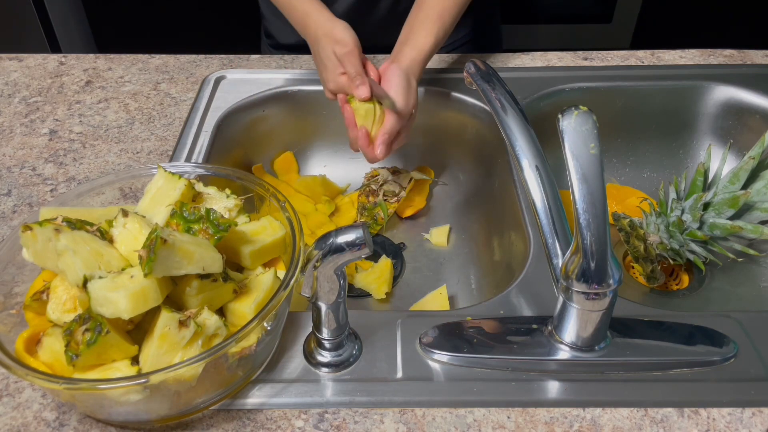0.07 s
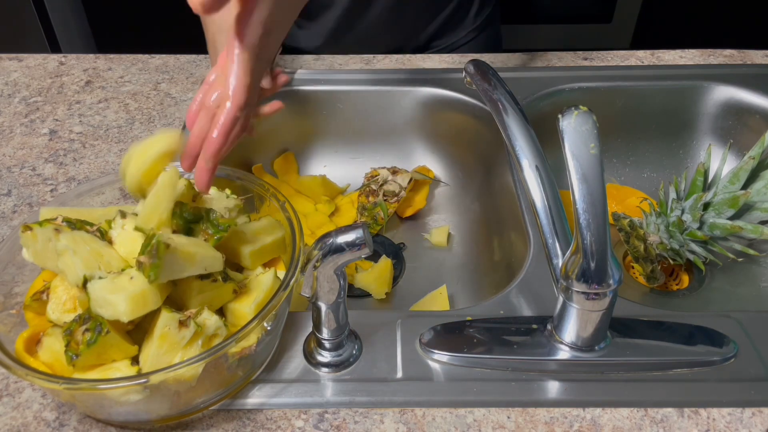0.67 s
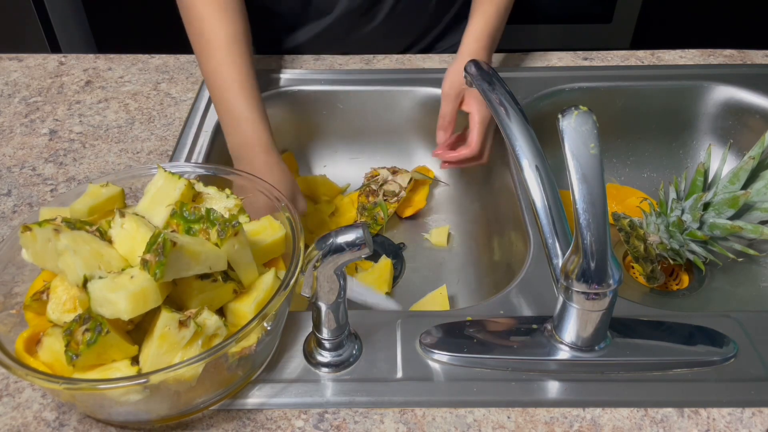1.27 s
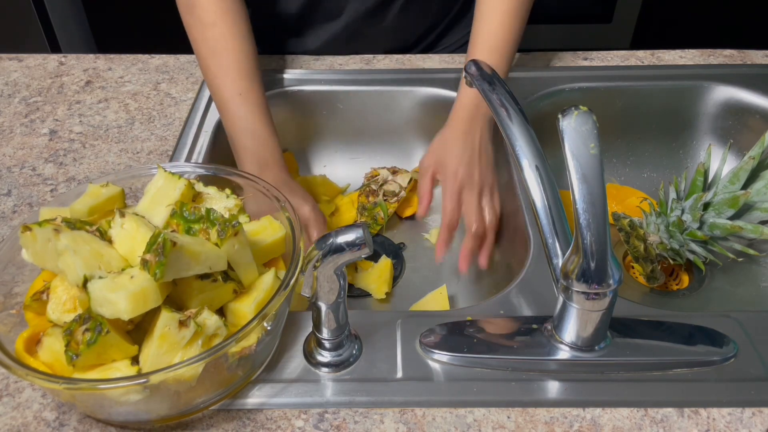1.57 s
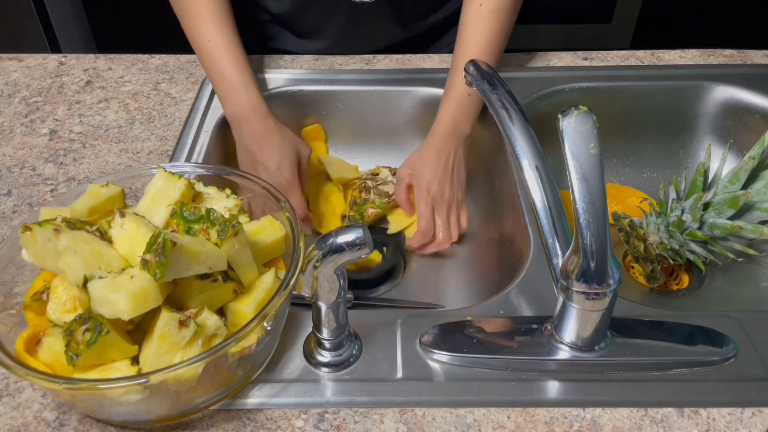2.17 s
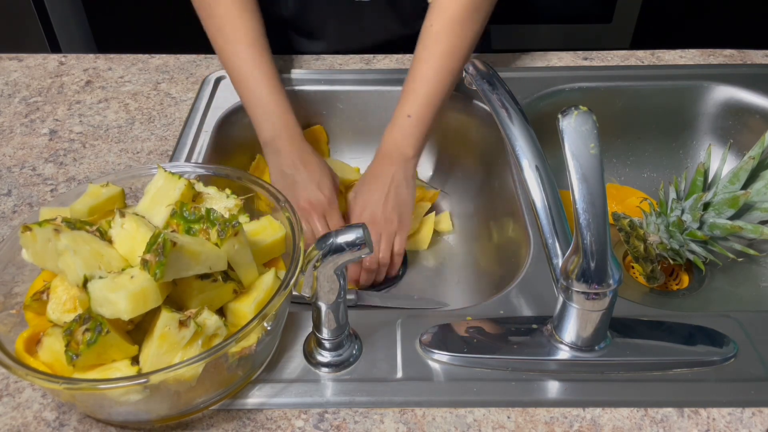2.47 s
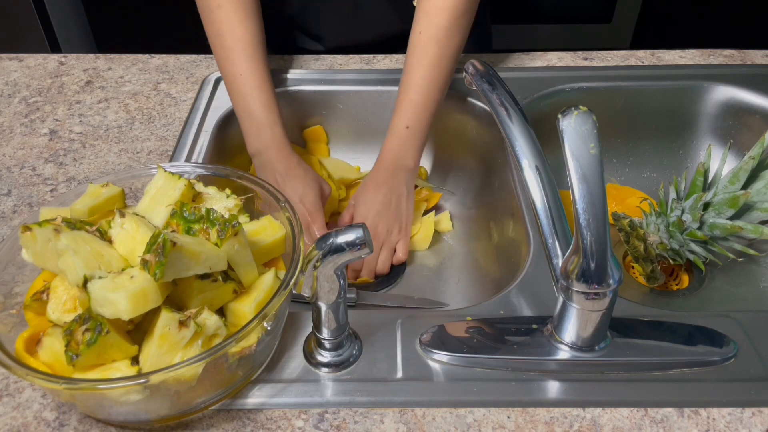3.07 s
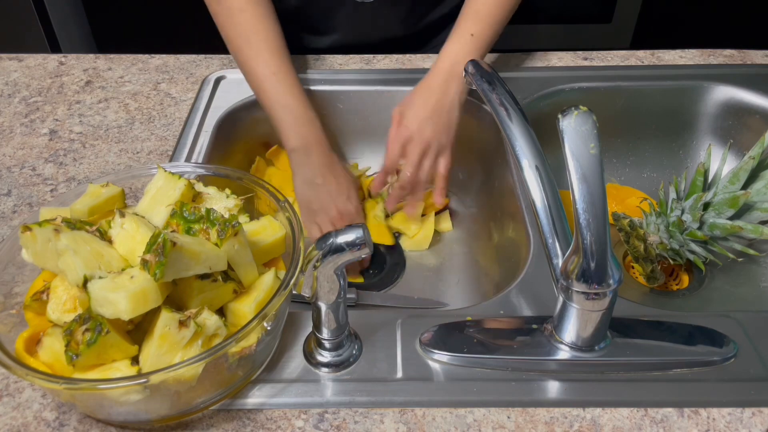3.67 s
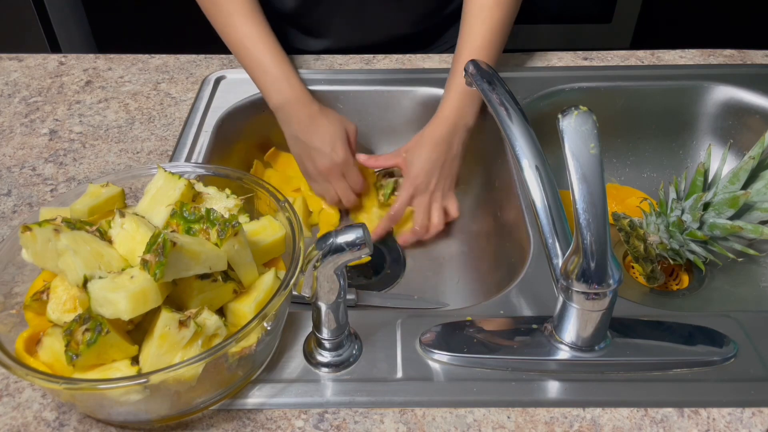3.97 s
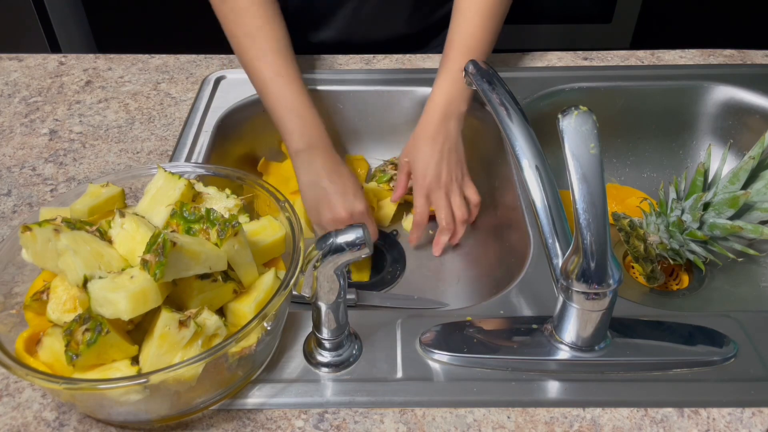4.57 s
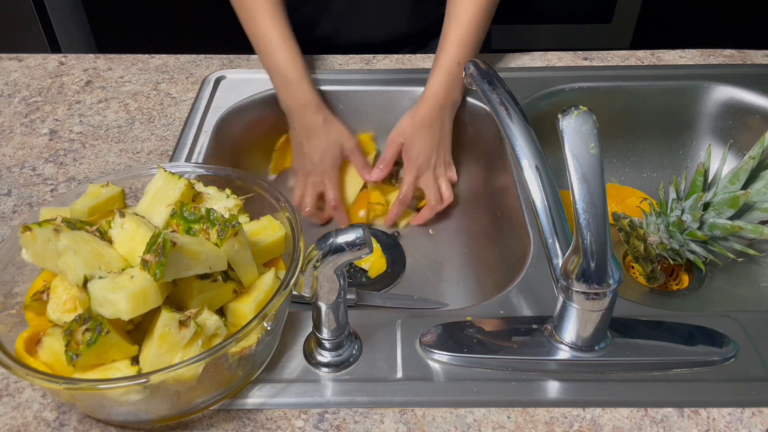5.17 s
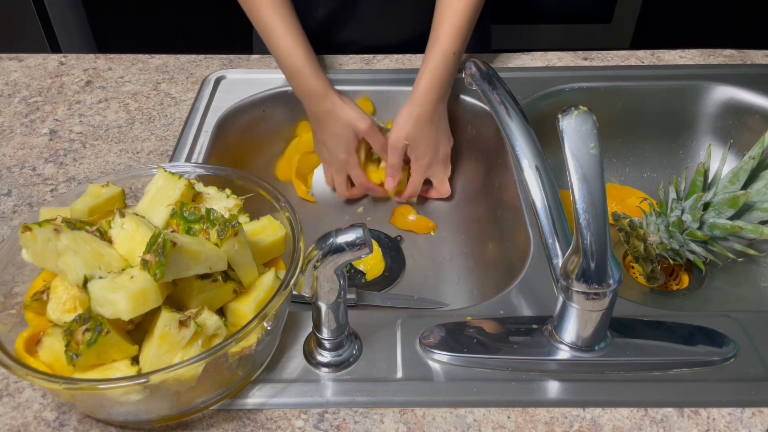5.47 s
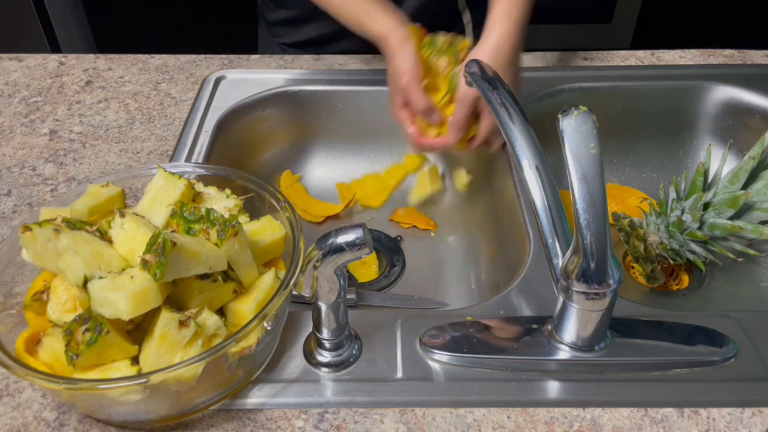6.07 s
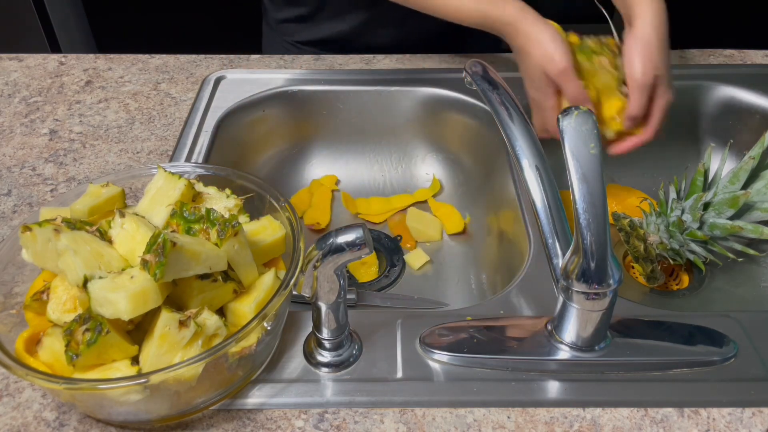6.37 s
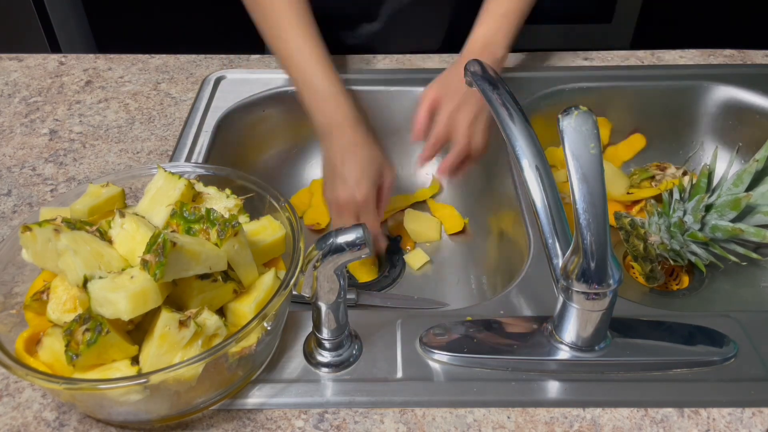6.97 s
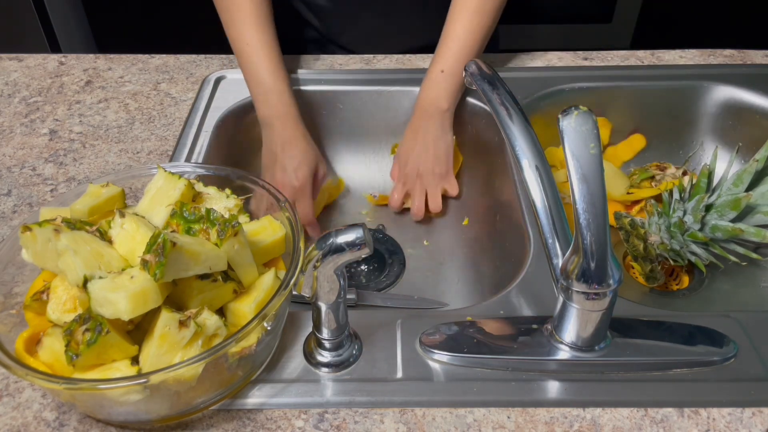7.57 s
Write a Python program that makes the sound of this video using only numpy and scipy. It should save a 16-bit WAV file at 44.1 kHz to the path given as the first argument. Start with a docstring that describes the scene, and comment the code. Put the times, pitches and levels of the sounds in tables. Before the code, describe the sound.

A knife clanks into a metal sink, then wet fruit scraps are scraped together and dumped with slaps, squelches and hollow thumps.

```python
"""Wet rustling, slaps and hollow booms: hands clear fruit peel out of a steel kitchen sink, near a phone.
A knife clatters into the basin, fingers sweep the scraps together and tap the drain strainer,
and a handful is dumped into the second basin. The thin steel floor booms under every push,
sliding peel rasps and juice crackles. A small kitchen and its low hum lie behind."""
import sys
import numpy as np
from scipy import signal
from scipy.fft import rfft, irfft, next_fast_len
from scipy.io import wavfile
from scipy.ndimage import uniform_filter1d

SR = 44100
rng = np.random.default_rng(int(sys.argv[2]) if len(sys.argv) > 2 else 0)


def to_wav(s):
    """Save 16-bit WAV."""
    ch = np.atleast_2d(s).T  # columns
    pcm = np.round(np.clip(ch, -1, 1) * 32767)  # PCM
    wavfile.write(sys.argv[1], SR, pcm.astype(np.int16))


N = 345303
TIME = np.arange(N) / SR
AGE = np.arange(int(.45 * SR)) / SR  # seconds since one short sound began

# ringing notes of the basin wall and the steel panel: f/Hz, level/dB, t60/s (time to fade by 60 dB)
WALL_NOTES = [(226.5, 10, 0.07), (250, 5.5, 0.075), (297.4, -7.5, 0.41), (352, -9, 0.2), (480, -7, 0.11)]
PANEL_NOTES = [(647, -5, 0.077), (934, 2.5, 0.11), (1178, 2, 0.12), (1313, 6.5, 0.11), (1534, -4.5, 0.22),
               (1530, -3.5, 0.18), (1637, 7, 0.15), (1890, -1.5, 0.067), (2160, -21, 0.2),
               (2420, -20, 0.27), (2530, -6.5, 0.21), (2810, -5, 0.1), (3440, -32, 0.056),
               (4070, 5.5, 0.04)]
# tone curves of rubbed steel, fizzing juice, crisp clicks and sticky fruit: f/Hz, level/dB
RUB_TONE = [(150, -33.5), (350, 5.5), (520, 2.5), (680, 3), (850, 1.5), (1050, 1), (1300, -0.5),
            (1550, -1.5), (2100, -6.5), (3200, -7.5), (5000, -18.5), (12000, -40)]
FIZZ_TONE = [(700, -40.5), (2000, 7.5), (3500, 2.5), (4700, 6), (5600, -1), (6800, 5.5), (8500, -4.5),
             (12000, -3.5), (14000, -11), (16000, -49.5)]
CRISP_TONE = [(4000, -4), (6500, 4), (9000, 0), (11000, 3.5), (13500, -1.5), (15500, -12)]
STICKY_TONE = [(900, -21), (1800, 3), (4200, -3), (6500, -9), (9000, -18.5), (13000, -14), (15500, -18)]


def undb(db):
    """Turn decibels into a gain."""
    return 10 ** (np.asarray(db) / 20)


def unit(x):
    """Scale to an average (rms) level of 1."""
    return x / np.sqrt(np.mean(x ** 2))


def at_level(x, db, size=660):
    """Scale a sound so that its start (15 ms by default) has this level."""
    return x * undb(db) / np.sqrt(np.mean(x[:size] ** 2))


def fade(t60):
    """Die away by 60 dB in t60 seconds."""
    return np.exp(-np.log(1000) * AGE / t60)


def onset(rise_s):
    """Rise from silence; a softer contact rises more slowly."""
    return 1 - np.exp(-AGE / rise_s)


def burst(t60):
    """Noise that dies away."""
    return rng.standard_normal(len(AGE)) * fade(t60)


def add(track, s, x):
    """Mix a sound in at s seconds."""
    i = int(s * SR)
    track[i:i + len(x)] += x[:N - i]


def dull(x, hz, order=2):
    """Turn down the treble above hz."""
    return signal.sosfilt(signal.butter(order, hz, fs=SR, output="sos"), x)


def colour(x, tone):
    """Filter a sound through a tone curve."""
    n = 2 * next_fast_len(x.shape[-1])
    hz, db = np.transpose(tone)
    bin_hz = np.arange(n // 2 + 1) * SR / n
    curve_db = np.interp(np.log(bin_hz + 1), np.log(hz), db)
    # folding the cepstrum makes the filter ring only after a hit, never before
    cepstrum = irfft(np.log(undb(curve_db)))
    cepstrum[1:n // 2] *= 2
    cepstrum[n // 2 + 1:] = 0
    return irfft(rfft(x, n) * np.exp(rfft(cepstrum)))[..., :x.shape[-1]]


def resonate(x, hz, q):
    """Pick out one pitch; a higher q rings longer."""
    return signal.lfilter(*signal.iirpeak(hz, q, fs=SR), x)


def crack(hz, t60, q):
    """A very short smack around one pitch."""
    return resonate(burst(t60)[:2048], hz, q)


def ring(notes, scatter_db=2, detune=0.0054):
    """Steel struck at a new spot: each note gets its own strength, sign and slight mistuning."""
    out = np.zeros(len(AGE))
    for hz, db, t60 in notes:
        strength, tuning, sign = rng.standard_normal(3)
        wave = np.sin(2 * np.pi * hz * (1 + detune * tuning) * AGE)
        out += np.sign(sign) * undb(db + scatter_db * strength) * fade(t60) * wave
    return out


def wander(per_s):
    """A smooth random drift with a spread near 1."""
    step = int(SR / per_s)
    stairs = np.repeat(rng.standard_normal(N // step + 1), step)
    return unit(uniform_filter1d(stairs, step)[:N])


def grains(size, per_s, spread_db):
    """Tiny random clicks of very unequal strength."""
    strength = undb(spread_db * np.minimum(rng.exponential(size=size), 4))
    return unit(rng.standard_normal(size) * strength * (rng.random(size) < per_s / SR))


def effort(start, length, grip_s, ease_db_per_s=16, let_go_s=0.029):
    """Strength of one hand movement: it takes hold, eases off as the hand slows, and lets go."""
    age = np.maximum(TIME - start, 0)
    hold = undb(-ease_db_per_s * np.minimum(age, length))
    release = np.exp(-np.maximum(age - length, 0) / let_go_s)
    return np.minimum(age / grip_s, 1) * hold * release


def diffuse(size, alike_hz=350, alike=.95):
    """Noise from all sides: left and right are alike in the bass, unrelated in the treble."""
    mid, side = rfft(rng.standard_normal((2, size)))
    hz = np.arange(len(mid)) * SR / size
    likeness = alike / (1 + (hz / alike_hz) ** 2)
    common = mid * np.sqrt(1 + likeness)
    opposite = np.array([[1], [-1]]) * side * np.sqrt(1 - likeness)
    return irfft(common + opposite, size) / np.sqrt(2)


def kitchen(air_db=-51, waver_db=1, hum_hz=60, hum_db=-56):
    """Gently wavering room noise and the hum of an appliance."""
    # tone of the room noise: f/Hz, level/dB
    air_tone = [(25, -33.5), (45, -4.5), (62, -1), (95, 2.5), (140, -13), (195, -7), (290, -17), (560, -17),
                (750, -26.5), (1000, -23.5), (1600, -28), (5500, -35), (9000, -41.5), (13500, -47),
                (16000, -63)]
    air = unit(colour(diffuse(N, alike_hz=566, alike=0.89), air_tone))
    hum = np.sqrt(2) * np.sin(2 * np.pi * hum_hz * TIME)
    return air * undb(air_db + waver_db * wander(4.13)) + hum * undb(hum_db)


def echoes(x, bass_t60=0.47, treble_t60=0.096, early_t60=0.035, early_db=5, first_s=0.0022, gain_db=-6):
    """Sound bounces quickly between the basin walls, then dies away in the small kitchen."""
    noise = diffuse(len(AGE))
    bass = dull(noise, 1500, order=1)
    tail = bass * fade(bass_t60) + (noise - bass) * fade(treble_t60)
    early = undb(early_db) * diffuse(len(AGE)) * fade(early_t60)
    echo = unit((tail + early) * (AGE > first_s)) / np.sqrt(len(AGE))
    echo = colour(echo, [(160, -8.5), (260, -1.0), (420, -5.0), (8000, 5.0), (15000, -8.0)])
    return undb(gain_db) * signal.fftconvolve(x[None], echo, axes=1)[:, :N]


def bubbles(count=540, db=-64.5, scatter_db=4.5, low_hz=800, high_hz=5500, cycles=16, rise=.12):
    """Tiny bubbles burst in the film of juice, each a brief rising blip."""
    out, age = np.zeros(N), AGE[:3000]
    for when, pitch, strength in rng.random((count, 3)):
        hz = low_hz * (high_hz / low_hz) ** pitch
        life = np.minimum(age * hz / cycles, 2)
        blip = np.sin(2 * np.pi * hz * age * (1 + rise * life)) * life * np.exp(-np.log(1000) * life)
        tilt_db = -2 * np.log2(hz / low_hz)  # higher blips are quieter
        add(out, when * N / SR, at_level(blip, db + scatter_db * (2 * strength - 1) + tilt_db))
    return out


def sticky_fingers(per_s=26, spread_db=1.5, q=6, grip_s=0.049):
    """Threads of juice part between fingers and fruit: sparse tiny clicks at ten pitches."""
    # fingers squeezing the fruit: start/s, length/s, level/dB
    squeezes = [(0, 0.21, -68), (0.54, 0.42, -68), (1.09, 0.41, -69), (1.87, 0.32, -57), (2.5, 0.22, -69),
                (3.234, 0.17, -73.5), (3.71, .5, -65.5), (4.266, 0.25, -68), (4.68, 0.19, -71),
                (4.98, 0.46, -66)]
    squeezing = sum(undb(db) * effort(start, length, grip_s) for start, length, db in squeezes)
    clicks = sum(unit(resonate(grains(N, per_s, spread_db), hz, q)) * np.sqrt(hz)
                 for hz in np.geomspace(1400, 12000, 10))
    return unit(colour(clicks, STICKY_TONE)) * squeezing


def ticks(t60=0.0081):
    """Tiny bright clicks: the knife ticking on steel, and wet peel coming loose."""
    # clicks of the knife and the peel: t/s, level/dB
    clicks = [(.648, -62), (.657, -68), (.716, -73), (.778, -74), (.814, -69), (.836, -68), (0.869, -63),
              (.94, -69), (1.442, -40.5), (1.483, -39), (2.452, -72), (2.77, -67), (3.283, -75),
              (4.712, -72), (2.929, -61), (3.1092, -59), (3.81, -60.5), (4.134, -61), (4.216, -65),
              (4.372, -55.5), (4.403, -64), (6.031, -67), (6.102, -59.5), (6.154, -47.5), (6.284, -67),
              (6.576, -45)]
    out = np.zeros(N)
    for s, db in clicks:
        add(out, s, at_level(colour(burst(t60)[:4096], CRISP_TONE), db))
    return out


def rustle(flutter_db=5.5, grip_s=0.049):
    """Thin peel slides over peel with a fine, bright crackle."""
    # sliding movements: start/s, length/s, level/dB
    slides = [(0, 0.075, -66.5), (.62, .28, -81), (1.677, 0.18, -40.5), (1.86, 0.59, -63.5),
              (2.5, 0.33, -72.5), (3.326, 0.17, -73), (3.92, 0.19, -67), (4.965, 0.26, -55),
              (5.27, 0.12, -74), (5.455, 0.16, -61), (6.37, 0.14, -59), (6.5, 0.15, -52.5),
              (6.681, 0.015, -38), (6.75, 0.041, -52), (7.184, 0.061, -71), (7.613, 0.37, -58.5)]
    sliding = sum(undb(db) * effort(start, length, min(grip_s, length)) for start, length, db in slides)
    crisp = unit(colour(grains(N, 2200, 2.3), CRISP_TONE))
    return crisp * sliding * undb(flutter_db * wander(63))


def judders(width_hz=22):
    """A finger slips in quick, uneven jerks, making the panel give a short groan that glides in pitch."""
    # fingers and peel juddering on steel: start/s, length/s, f/Hz, glide/octaves, level/dB
    groans = [(1.565, 0.054, 479.4, 0.0028, -38.5), (1.613, 0.061, 498, -0.07, -40.5),
              (1.711, 0.035, 375.2, -0.015, -35.5), (1.899, 0.093, 655, 0.049, -45.5),
              (1.938, 0.034, 1734, .06, -43.5), (2.03, 0.05, 482, 0.087, -45.5),
              (2.065, 0.07, 558.6, -0.081, -41.5), (2.08, 0.054, 1110, -0.12, -47),
              (2.13, 0.14, 498, 0.17, -49), (2.198, 0.073, 738, -0.13, -48), (3.191, 0.036, 702, 0.43, -59),
              (5.436, 0.039, 648, 0.053, -52), (6.074, 0.081, 287, -0.053, -47),
              (6.268, 0.084, 306, 0, -43), (6.36, 0.11, 319, -0.045, -56)]
    out = np.zeros(N)
    for s, length, hz, glide, db in groans:
        travel = np.minimum(AGE / length, 1)
        tone = np.exp(2j * np.pi * np.cumsum(hz * 2 ** (glide * travel)) / SR)
        # keep the slips near the pitch; reversing skips the filter's slow start
        wobble = dull(grains(len(AGE), 2300, 0.55) / tone, width_hz)[::-1]
        groan = np.real(wobble * tone) * np.sin(np.pi * travel)
        add(out, s, at_level(groan, db, size=int(length * SR)))
    return out


def flicks(wet, count=480, relative_db=-7, scatter_db=7, low_hz=1800, high_hz=12000):
    """Wet edges of dragged peel flick free at random, each with its own pitch and strength."""
    out = np.zeros(N)
    for when, pitch, strength in rng.random((count, 3)):
        flick = crack(low_hz * (high_hz / low_hz) ** pitch, t60=0.005, q=2.5)
        add(out, when * N / SR, at_level(flick, relative_db + scatter_db * (2 * strength - 1)))
    return colour(out, STICKY_TONE) * wet


def sweep(jerk_db=5.5, panel_db=2, panel_q=30, catch_db=-1, stick_db=-47):
    """Dragged peel makes the floor rumble, the panels rasp and the water fizz; pressed hard, it jerks."""
    # hand strokes: start/s, length/s, grip time/s, rumble/dB, rubbing/dB, fizz/dB
    strokes = [(0, 0.042, 0.016, -51, -61, -63), (0.62, 0.28, 0.04, -76, -67, -74),
               (1.472, 0.19, .03, -34.5, -46, -38.5), (1.706, 0.12, 0.044, -40, -43.5, -44.5),
               (1.88, 0.12, 0.027, -54, -44, -49), (2.037, 0.21, 0.042, -51.5, -44, -57),
               (2.186, 0.037, 0.031, -38, -43.5, -55.5), (2.527, .28, 0.043, -46.5, -75.5, -73),
               (2.885, 0.11, 0.047, -49, -79.5, -70), (3.353, 0.134, 0.14, -61, -69, -63),
               (3.873, .17, 0.047, -50, -54, -56), (4.353, 0.21, 0.026, -50.5, -62.5, -79),
               (4.901, 0.15, 0.025, -45.5, -53.5, -57), (4.986, .24, 0.027, -48.5, -51, -54.5),
               (5.208, 0.24, .06, -55.5, -58.5, -73), (5.38, 0.29, 0.097, -48, -58, -56.5),
               (6.251, 0.048, 0.042, -36, -40.5, -52), (6.336, 0.74, .06, -65, -64.5, -63.5),
               (6.596, 0.011, 0.0053, -46, -44, -51.5), (6.664, 0.056, .03, -66, -62.5, -73),
               (6.778, 0.049, .02, -42, -80, -61), (7.101, 0.1, 0.012, -38.5, -53.5, -59.5),
               (7.163, 0.077, 0.073, -61, -43.5, -44.5), (7.268, 0.25, 0.098, -48.5, -50.5, -55.5),
               (7.538, .32, 0.065, -56, -54, -55)]
    # the hands never quite rest: rumble/dB, rubbing/dB, fizz/dB
    fidget_db = (-61, -71.5, -96)
    # tone of the rumbling basin floor: f/Hz, level/dB
    rumble_tone = [(50, -19), (105, -28), (138, 6.5), (190, -13), (270, -10), (350, -22), (500, -34),
                   (1000, -75)]
    moving = sum(undb(levels)[:, None] * effort(start, length, grip)
                 for start, length, grip, *levels in strokes)
    push, rub, wet = np.hypot(moving, undb(fidget_db)[:, None])
    sticking = rub / (rub + undb(stick_db))
    jerks = undb(jerk_db * sticking * wander(70))
    rumble = unit(colour(grains(N, 730, 1.96), rumble_tone))
    slips = colour(grains(N, 3000, 1.1) * undb(2.6 * sticking * wander(160)), RUB_TONE)
    panels = sum(resonate(slips, hz, panel_q) for hz in (552, 709, 1077, 1530, 1696))
    rasp = unit(slips + undb(panel_db) * panels)
    # ridges of the peel catch and let go in bursts a few milliseconds long
    catches = unit(signal.fftconvolve(np.abs(grains(N, 90, 2.6)), fade(.014))[:N])
    water = grains(N, 6000, 4.5)
    crackle = undb(catch_db) * sticking * catches * rng.standard_normal(N)
    fizz = unit(colour(water + crackle, FIZZ_TONE))
    return jerks * (rumble * push + rasp * rub + fizz * wet) + flicks(wet)


def spatter(t60, squeeze_s=0.0027):
    """Juice squeezed out by a hit gives a short fizz."""
    return colour(grains(len(AGE), 6900, 2.7) * fade(t60) * onset(squeeze_s), FIZZ_TONE)


def strainer(tick_t60=0.011, rattle_db=-8, rattle_t60=0.11, contact_s=0.00082):
    """The strainer clunks against the drain and rattles briefly in its seat."""
    # finger taps: t/s, clunk/dB, wet tick/dB, treble limit/Hz
    taps = [(2.443, -40, -74, 1510), (2.509, -41.5, -59, 1500), (2.6027, -33.5, -64, 1370),
            (2.655, -43.5, -77, 2200), (3.1095, -38, -50, 4500)]
    # ringing notes of the strainer: f/Hz, level/dB, t60/s
    notes = [(486, -6, 0.24), (524, 6.5, 0.1), (620, -10, 0.07), (1031, 2.5, 0.088), (1112, 6, 0.048),
             (1276, -10, 0.21), (1930, -9, 0.043)]
    out = np.zeros(N)
    for s, clunk_db, tick_db, dull_hz in taps:
        rattle = colour(burst(rattle_t60), RUB_TONE)
        clunk = at_level(ring(notes), 0) + at_level(rattle, rattle_db)
        clunk = dull(clunk * onset(contact_s), dull_hz)  # its rubber rim softens the hit
        add(out, s, at_level(clunk, clunk_db) + at_level(spatter(tick_t60), tick_db))
    return out


def smacks(t60=0.0047, q=4.9):
    """Stiff wet rind lands flat on the steel: a sharp smack that is over at once."""
    # rind landing: t/s, level/dB, f/Hz
    landings = [(2.93, -56, 1090), (2.931, -62, 2370), (3.1092, -41.5, 1220), (3.1092, -58.5, 3000),
                (4.386, -51.5, 1050), (5.010, -44, 1150), (5.34, -61, 4100), (5.631, -44.5, 960),
                (5.991, -58.5, 1190), (6.6682, -35, 1650), (6.668, -38.5, 2640), (6.6687, -39.5, 6760),
                (7.13, -52, 5240), (7.605, -50, 1000), (7.713, -54, 2860)]
    out = np.zeros(N)
    for s, db, hz in landings:
        add(out, s, at_level(dull(crack(hz, t60, q), 2.1 * hz), db))
    return out


def slaps(q=8, broad_db=-8, contact_s=0.00018, juice_t60=0.032):
    """Wet pieces land: a dull knock around one note of the panel, and a spatter of juice."""
    # pieces landing: t/s, slap/dB, f/Hz, juice/dB
    landings = [(1.572, -36.5, 480, -36.5), (1.629, -38, 474, -57), (1.707, -37, 528, -44),
                (1.748, -34, 520, -43), (1.827, -28.5, 527, -36), (1.838, -30.5, 498, -29),
                (2.897, -47, 824, -66), (3.908, -48.5, 880, -52), (3.927, -42.5, 1290, -44),
                (4.117, -48, 1010, -83), (4.31, -53.5, 1310, -74), (5.012, -43.5, 850, -58),
                (5.633, -48, 686, -79), (6.158, -33.5, 620, -50.5), (6.269, -35, 695, -54),
                (6.278, -34.5, 622, -46), (6.576, -43.5, 237, -63), (6.593, -45.5, 1490, -45.5),
                (6.668, -34, 426, -58), (6.675, -29, 680, -50), (6.686, -39, 1490, -43),
                (6.696, -60, 675, -40.5), (7.045, -45, 545, -85), (7.131, -38.5, 1020, -44),
                (7.586, -50, 1500, -51.5), (7.606, -42, 680, -50.5)]
    out = np.zeros(N)
    for s, db, hz, juice_db in landings:
        t60 = 0.1 * 2 ** ((db + 47) / 48)  # heavier, louder pieces settle more slowly
        force = burst(t60) * onset(contact_s)
        body = dull(colour(force, RUB_TONE), 2.1 * hz, order=3)  # lower knocks have less treble
        knock = resonate(body, hz, q) + undb(broad_db) * body
        add(out, s, at_level(knock, db) + at_level(spatter(juice_t60), juice_db))
    return out


def knocks(contact_s=0.00036):
    """The bouncing knife, knuckles and hard rind knock on the basin: the wall booms, the panel rings."""
    # hits, duller when soft: t/s, wall/dB, panel/dB, treble limit/Hz
    hits = [(1.439, -35.5, -54, 2500), (1.573, -28.5, -37, 2500), (1.628, -36.5, -42, 1400),
            (1.7035, -32, -44, 1100), (1.7475, -28, -33.5, 2000), (1.8265, -25, -33, 1200),
            (1.847, -30, -36, 1700), (3.927, -43, -52, 1500), (6.158, -32, -45, 1100)]
    out = np.zeros(N)
    for s, wall_db, panel_db, dull_hz in hits:
        panel = dull(ring(PANEL_NOTES, scatter_db=-1.0), dull_hz)
        knock = at_level(ring(WALL_NOTES), wall_db) + at_level(panel, panel_db)
        add(out, s, knock * onset(contact_s))
    return out


def thuds(floor_hz=137, floor_t60=0.22, push_s=0.0042, sag=0.088, sag_s=0.0061, overtone_db=-17):
    """A soft weight lands on the basin floor: the pitch sags as it settles, and the steel rings on."""
    # soft blows: t/s, level/dB, f/Hz
    blows = [(0.866, -40.5, 77.6), (0.975, -47, 82), (1.435, -35.5, 144), (1.458, -34.5, 74),
             (1.497, -20.5, 146.5), (1.571, -30.5, 141), (1.751, -32, 140.4), (1.83, -29, 174),
             (1.991, -34.5, 135), (2.042, -39.5, 139), (2.449, -32.5, 119), (2.471, -37.5, 66.6),
             (2.604, -32.5, 171), (2.655, -38, 158), (2.893, -30.5, 178), (3.924, -32.5, 134.3),
             (4.124, -40, 133.3), (4.22, -43, 130), (4.411, -29.5, 131.4), (4.413, -36.5, 65),
             (5.037, -37, 135), (6.109, -23, 128), (6.159, -21.5, 139), (6.208, -29, 126.3),
             (6.578, -18.5, 160.5), (6.611, -19, 138.3), (6.66, -24, 132.4), (6.781, -33.5, 142.4),
             (7.058, -39.5, 133), (7.134, -29, 135.3), (7.61, -36.5, 134.4)]
    # the floor's own notes: f/Hz, level/dB, t60/s
    floor_notes = [(137, -13.5, 0.65), (170, -8.5, 0.045), (67.55, -22.5, 1)]
    out = np.zeros(N)
    ringing = sum(undb(db) * fade(t60) * np.sin(2 * np.pi * hz * AGE) for hz, db, t60 in floor_notes)
    for s, db, hz in blows:
        t60 = floor_t60 * min(floor_hz / hz, 1) ** 4.8  # stiffer, higher spots die away sooner
        phase = 2 * np.pi * np.cumsum(hz * (1 + sag * np.exp(-AGE / sag_s))) / SR
        boom = np.sin(phase) * fade(t60)
        overtone = undb(overtone_db) * np.sin(3.2 * phase) * fade(t60 / 2)
        add(out, s, at_level((boom + overtone + ringing) * onset(push_s), db))
    return dull(out, hz=420)


def knife(clash_t60=0.038, shimmer_t60=.16, shimmer_db=-5, contact_s=0.00086):
    """Steel hits steel: a short clash, the blade clinks, the thin sheet rings and the wall booms."""
    # the knife hitting the basin: t/s, clash/dB, blade/dB, sheet/dB, wall/dB
    hits = [(1.372, -29, -28.5, -58, -31.5), (1.483, -33, -33, -37, -45), (1.4957, -10, -24.5, -22.5, -17),
            (1.5012, -33, -48, -23.5, -32), (1.522, -43, -48.5, -46.5, -46)]
    # ringing notes of the blade: f/Hz, level/dB, t60/s
    blade_notes = [(1254, -11, .09), (1540, 0, 0.12), (1645, -4, 0.037), (1820, -17, 0.031),
                   (2864, 2.5, 0.05), (4120, -11, 0.028), (6640, -6.5, .05)]
    # tones of the clash and of the shimmering sheet steel: f/Hz, level/dB
    clash_tone = [(150, -12), (400, -9.5), (700, -4), (950, 5), (1300, -6), (1600, 6.5), (2300, -4),
                  (3000, -10.5), (3900, -5.5), (5500, -9.5), (7000, -8.5), (12000, -13.5), (15500, -27)]
    shimmer_tone = [(500, -22), (800, -25), (950, 2), (1300, -14), (1580, -19), (1950, 17), (2400, -2),
                    (3900, -51), (5500, -58.5), (12000, 0.5), (15500, -32)]
    out = np.zeros(N)
    for s, clash_db, blade_db, sheet_db, wall_db in hits:
        clash = at_level(colour(burst(clash_t60), clash_tone), clash_db)
        shimmer = at_level(colour(burst(shimmer_t60), shimmer_tone), shimmer_db)
        sheet = at_level(at_level(ring(PANEL_NOTES), 0) + shimmer, sheet_db)
        blade = at_level(ring(blade_notes), blade_db)
        wall = at_level(ring(WALL_NOTES), wall_db)
        add(out, s, (clash + blade + sheet + wall) * onset(contact_s))
    return out


def two_mics(x, lag_ms=0.066):
    """Sound reaches the phone's nearer microphone first and the farther one a moment later."""
    n = next_fast_len(N)
    hz = np.arange(n // 2 + 1) * SR / n
    delay = np.exp(-2j * np.pi * hz * lag_ms / 1000)
    return np.array([x, irfft(rfft(x, n) * delay, n)[:N]])


def scene(direct_db=-1.5):
    """The first basin lies left of the phone, the second to its right."""
    # when the hands work in the second basin: t/s, share of the sound/(0 to 1)
    second_basin = [(6.2, 0), (6.45, 1), (6.85, 1), (7.0, 0)]
    # microphone sensitivity: left/dB, right/dB
    mic_db = [-.55, .55]
    blows = knife() + knocks() + thuds() + slaps() + smacks() + strainer()
    sink = blows + sweep() + judders() + rustle() + ticks() + sticky_fingers() + bubbles()
    share = np.interp(TIME, *np.transpose(second_basin))
    direct = two_mics(sink * (1 - share)) + two_mics(sink * share)[::-1]
    return (undb(direct_db) * direct + echoes(sink) + kitchen()) * undb(mic_db)[:, None]


def record(dry, ceiling=0.84, top_hz=15900):
    """The phone rounds off the loudest peaks and cuts the highest treble."""
    rounded = ceiling * np.tanh(dry / ceiling)
    return signal.sosfilt(signal.ellip(8, .2, 80, top_hz, fs=SR, output="sos"), rounded)


dry = scene()
out = record(dry)
to_wav(out)
```